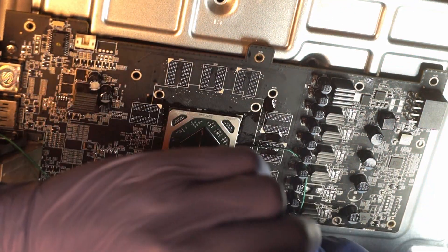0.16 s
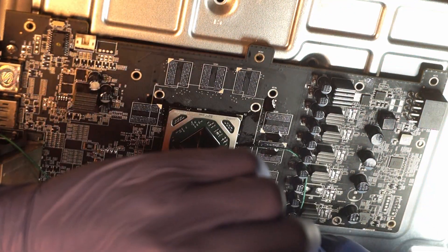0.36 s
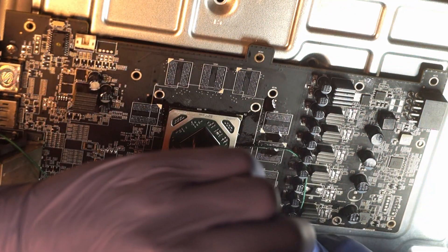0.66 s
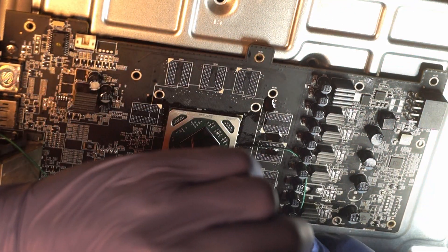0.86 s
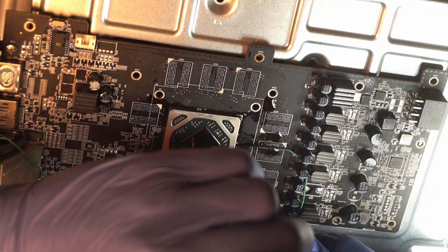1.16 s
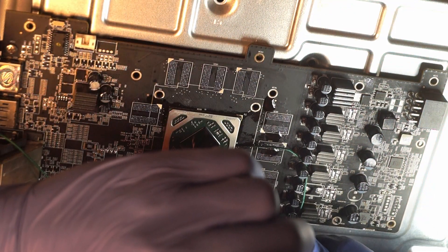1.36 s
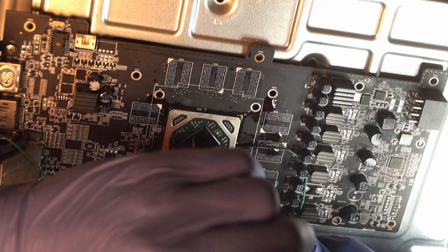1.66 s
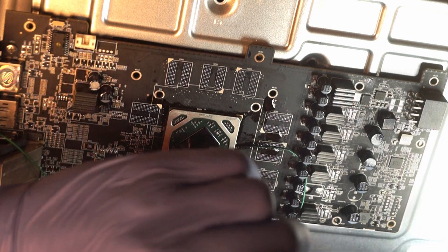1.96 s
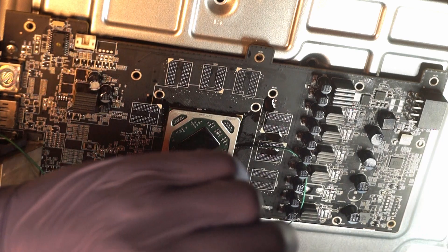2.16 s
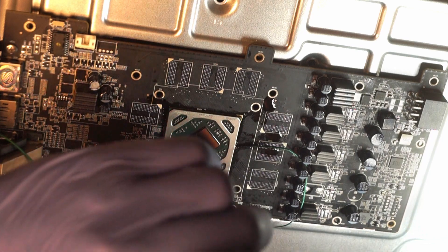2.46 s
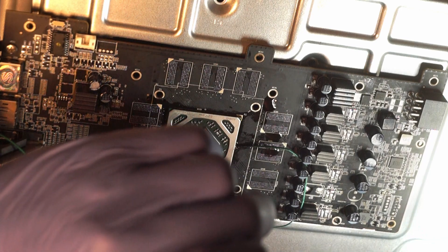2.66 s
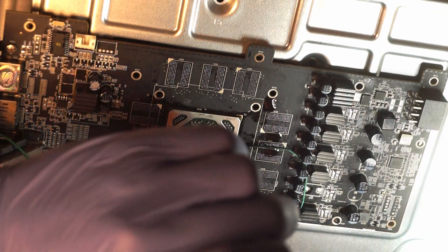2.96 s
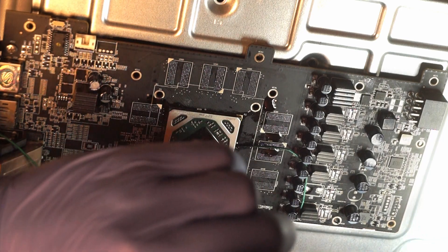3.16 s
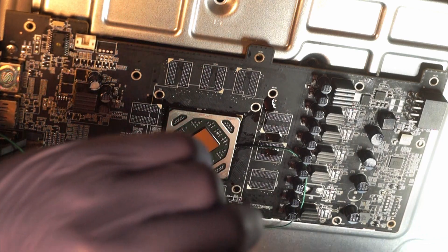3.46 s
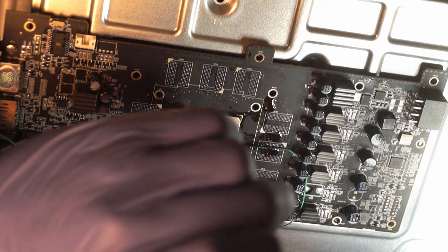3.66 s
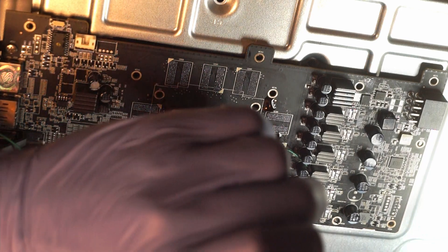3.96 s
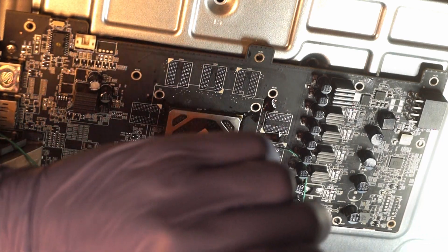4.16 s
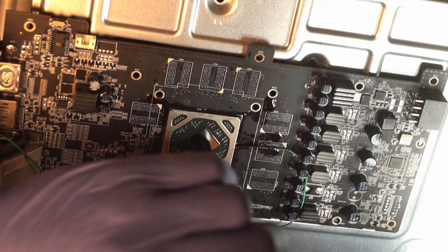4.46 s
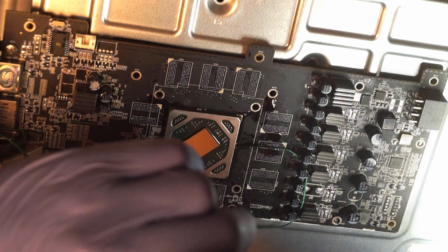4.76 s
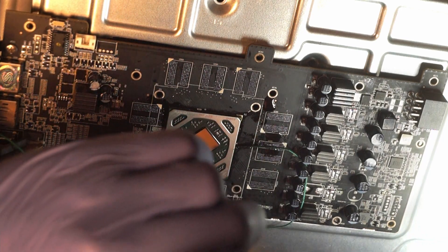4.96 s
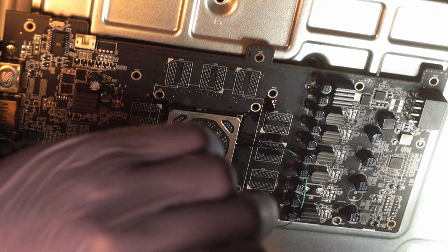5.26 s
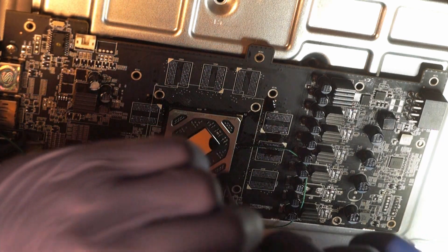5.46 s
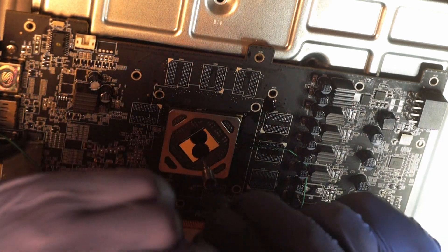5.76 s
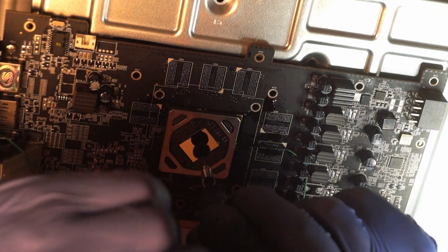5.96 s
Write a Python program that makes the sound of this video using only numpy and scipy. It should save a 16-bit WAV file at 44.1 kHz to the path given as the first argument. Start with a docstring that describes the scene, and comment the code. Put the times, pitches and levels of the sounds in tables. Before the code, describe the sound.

Close at a workbench in a small room, a hot air tool blows continuously: a breathy, fuzzy whistle inside a bright hiss, above a steady fan drone. Nearly halfway through comes a soft tap, then a sharp cluster of knocks with a short gritty slide. Afterwards the whistle dips and recovers as the hand turns the nozzle, fading again near the end while the hiss brightens.

```python
"""At a workbench, a hot air tool blows steadily over a circuit board. Its nozzle resonates in a fuzzy band near
3 kHz that fades as the hand turns it, while the jet's turbulent hiss brightens in swells. Something taps the
bench once, then knocks, rattles and slides on it: blows ring damped modes, friction makes gritty noise, and
the room answers with a decaying tail. A fan drones behind as shaped noise, with fuzzy tones and a wavering
blade tone."""
import sys
import numpy as np
from scipy import signal
from scipy.fft import rfft, irfft, next_fast_len
from scipy.io import wavfile
from scipy.ndimage import uniform_filter1d, map_coordinates

SR = 44100
rng = np.random.default_rng(int(sys.argv[2]) if len(sys.argv) > 2 else 0)


def decibels_to_gain(level_db):
    """Convert a level in decibels to a linear amplitude gain (20 dB per decade)."""
    exponent = np.asarray(level_db, float) / 20
    return 10 ** exponent


def wav_out(sig):
    """Save sig, one row per channel (or a flat mono array), as 16-bit PCM at SR to the path in sys.argv[1]."""
    wavfile.write(sys.argv[1], SR, np.round(np.clip(np.atleast_2d(sig).T, -1, 1) * 32767).astype(np.int16))


N = 269010  # length in samples


def unit(x):
    """Normalisation: scales x to an rms of 1."""
    return x / np.sqrt(np.mean(x ** 2) + 1e-20)


def along(points, hz):
    """Spectral interpolation: reads (Hz, value) points on a logarithmic frequency axis."""
    f, v = np.transpose(points)
    return np.interp(np.log(hz + 1), np.log(f + 1), v)


def swells(rows):
    """Superposition of bell-shaped swells (s, half length s, dB, ..): one curve for each dB column."""
    s, half, *columns = np.transpose(rows)
    bell = np.exp(-((np.arange(N)[:, None] / SR - s) / half) ** 2)
    return [bell @ column for column in columns]


def filtered(x, response):
    """Linear filtering: the spectrum of x is multiplied by a response of frequency."""
    m = next_fast_len(N + SR // 2)
    return irfft(rfft(x, m) * response(np.fft.rfftfreq(m, 1 / SR)), m)[..., :N]


def patched(x, depth_db, size, smear, twist=((1, 0),)):
    """Random modulation: a field smoothed over smear = (bins, frames) varies gain and left-right phase."""
    hz, _, z = signal.stft(x, SR, nperseg=size)
    field = uniform_filter1d(rng.standard_normal(z.shape), smear[0], 1)
    field = uniform_filter1d(field, smear[1], 2)
    # the two ears share most of the gain pattern, and turn in phase by opposite angles
    gain = decibels_to_gain(depth_db * unit(field + field[::-1] * 0.71))
    opposed = uniform_filter1d(field - field[::-1], 12, 1)
    phase = along(twist, hz)[:, None] * unit(opposed)
    return signal.istft(z * gain * np.exp(1j * phase), nperseg=size)[1][:, :N]


def rush(gain):
    """Partial coherence: stereo noise of rms 1, with the given gain over frequency."""
    # Each row: frequency in Hz, left-right correlation (no unit).
    alike = [(40, .3), (130, 0.83), (290, 1), (640, 0.81), (1400, 0.88), (3100, 0.77), (6800, 0.65),
             (15000, 0.26)]

    def turn(hz):
        return np.arccos(np.clip(along(alike, hz), -1, 1)) / 2

    def mid_side_gain(hz):
        return gain(hz) * [np.cos(turn(hz)), np.sin(turn(hz))]

    mid, side = filtered(rng.standard_normal((2, N)), mid_side_gain)
    return unit(np.array([mid + side, mid - side]))


def bands(modes):
    """Resonance: gain of side-by-side modes (Hz, width Hz, dB), each applied twice and summed in power."""
    return lambda hz: np.sqrt(sum(decibels_to_gain(2 * db) / (1 + (2 * (hz - c) / w) ** 2) ** 2 for c, w, db in modes))


def fuzzy(lines, width_hz, trim_db):
    """Narrow-band noise: a resonance on each line, at the lines' joint power shifted by trim_db."""
    total = np.sqrt(sum(decibels_to_gain(2 * db) for _, db in lines))
    return decibels_to_gain(trim_db) * total * rush(bands([(hz, width_hz, db) for hz, db in lines]))


def hot_air():
    """Flow noise: turbulence sings in the nozzle and hisses in the jet; turning shades song and body."""
    # Nozzle resonances. Each row: centre in Hz, width of one pass in Hz, relative level in dB.
    song_modes = [(2869, 52, -3.5), (3016, 63, 0.5), (3083, 74, -2), (3225, 124, 0), (3377, 21, -1),
                  (3320, 57, -15), (3334, 76, -16.5)]
    # Fuzzy tones of the heater tube. Each row: frequency in Hz, relative level in dB.
    pipe_lines = [(3629, -51), (3848, -54), (4000, -51), (4371, -55), (4421, -53), (4507, -55), (5324, -60)]
    # Spectrum of the jet's body. Each row: frequency in Hz, relative density in dB per Hz.
    jet_spectrum = [(1470, -46), (2500, -14.5), (2710, -15), (2920, -2), (3100, -13), (3510, -1.5),
                    (4650, -7), (5310, -5.5), (6580, -6.5), (8500, -16), (11000, -20), (18700, -120)]
    # Spectrum of the hiss. Each row: frequency in Hz, relative density in dB per Hz.
    hiss_spectrum = [(4400, -43), (7500, -2), (8600, -3.5), (9700, -1.5), (10800, -5), (11600, -7.5),
                     (13000, -8), (14300, -8.5), (15700, -8)]
    # Topmost hiss. Each row: centre in Hz, width of one pass in Hz, relative level in dB.
    sheen_modes = [(13400, 4300, 0)]
    # The hand turns the nozzle mouth away. Each row: time in seconds, shading of the song in dB.
    turning = [(0, 0), (1.6, 0.5), (2.1, 0.5), (2.8, -2), (3.15, -2), (3.45, -2.5), (3.6, -8), (3.9, -4.5),
               (4.2, -1.5), (4.5, 0), (4.8, -3), (4.9, -3.5), (5.3, -7), (5.62, -6), (5.75, -12), (6.1, -9)]
    # The jet swings nearer. Each row: centre in seconds, half length in seconds, swell of the hiss in dB,
    # swell of the topmost hiss in dB.
    swings = [(2.85, 0.39, -0.6, 8), (3.66, 0.14, 4.5, 6), (4.5, .12, 1.6, 1.5), (5.3, .3, 1.2, 7),
              (5.77, 0.16, 3.5, 3)]
    # base levels: nozzle facing, jet pointing past
    song_db, body_db, hiss_db, sheen_db = -32, -33, -41.5, -60
    body_follows = 0.22  # dB of jet body per dB of shading

    shade_db = np.interp(np.arange(N) / SR, *np.transpose(turning))
    hiss_swell_db, sheen_swell_db = swells(swings)
    voice = rush(bands(song_modes)) + fuzzy(pipe_lines, width_hz=21, trim_db=35.5)
    song = decibels_to_gain(song_db + shade_db) * voice
    body = decibels_to_gain(body_db + body_follows * shade_db) * rush(lambda hz: decibels_to_gain(along(jet_spectrum, hz)))
    hiss = decibels_to_gain(hiss_db + hiss_swell_db) * rush(lambda hz: decibels_to_gain(along(hiss_spectrum, hz)))
    hiss += decibels_to_gain(sheen_db + sheen_swell_db) * rush(bands(sheen_modes))
    # the moving hand reflects the treble: broad patches drift in and out
    return song + patched(body + hiss, depth_db=0.24, size=1024, smear=(10, 18))


def hand(x):
    """Reflection: the moving hand recolours the air sound."""
    # Colour of the reflection after the move. Each row: frequency in Hz, gain in dB.
    moved = [(1300, 0), (2050, -0.5), (2600, 0), (7000, 0), (8000, 1.5), (8800, -0.5), (9900, -0.5),
             (11000, -2), (11800, 2), (13300, -0.5)]
    # Narrow bands swell briefly, probably off the passing hand. Each row: centre in seconds,
    # half length in seconds, centre in Hz, peak gain in dB.
    glints = [(2.75, .3, 13400, 4), (3.0, .1, 15300, 5), (3.45, .08, 14300, 4), (3.68, .15, 12700, 1),
              (4.2, 0.064, 7800, 4), (5.0, .2, 11800, 2), (5.75, .12, 12600, 3), (5.8, .12, 9150, 5.5),
              (5.4, 0.42, 2030, 0.5)]
    move_s, move_rise_s = 2.35, 0.15  # the hand leaves its first rest
    glint_half_hz = 300

    hz, t, z = signal.stft(x, SR, nperseg=512)
    progress = (1 + np.tanh((t - move_s) / move_rise_s)) / 2
    db = np.outer(along(moved, hz), progress)
    for s, half, centre_hz, peak_db in glints:
        over_hz = np.exp(-((hz - centre_hz) / glint_half_hz) ** 2)
        over_time = np.exp(-((t - s) / half) ** 2)
        db = db + peak_db * np.outer(over_hz, over_time)
    return signal.istft(z * decibels_to_gain(db), nperseg=512)[1][:, :N]


def blow(push_hz):
    """Impact: a noisy crack and damped modes, excited most strongly near the push frequency; peak 1."""
    # Bench modes, before scatter. Each row: frequency in Hz, relative level in dB, 60 dB decay in seconds.
    modes = [(200, -9, 0.054), (366, -2.5, .04), (460, -4.5, 0.081), (570, 3, 0.028), (787, -1, 0.074),
             (1080, 5, 0.027), (1365, 7.5, 0.013), (1804, 7, 0.024), (2170, 2, 0.016), (2610, 6.5, 0.019),
             (3000, 8.5, 0.01), (3750, -4, 0.014), (4600, -6, 0.022), (6030, -2, 0.022)]
    t = np.arange(SR // 8) / SR
    ring = np.zeros(len(t))
    for hz, level, t60 in modes:
        mode_db = level + rng.normal(0, 3.3) - 2.5 * np.log2(hz / push_hz) ** 2
        mode_hz = hz * rng.normal(1, 0.022)
        ring += decibels_to_gain(mode_db - 60 * t / t60) * np.sin(2 * np.pi * mode_hz * t + rng.uniform(0, 2 * np.pi))
    octaves = signal.butter(2, [push_hz / 2, push_hz * 2], "band", fs=SR)
    crack = signal.lfilter(*octaves, rng.standard_normal(len(t))) * decibels_to_gain(11.0 - 60 * t / 0.016)
    x = (ring + crack) * (1 - np.exp(-t / 0.00014))  # soft onset
    return x / np.abs(x).max()


def knocks():
    """Superposition of impacts: a tap, then a cluster of knocks and rattles."""
    # Blows on the bench. Each row: start in seconds, peak level in dB before the low cut,
    # hardness as the centre of the push in Hz.
    blows = [(2.617, -19, 556), (2.620, -21, 1800), (2.625, -24, 500), (2.861, -8.5, 3450),
             (2.865, -7.5, 1800), (2.868, -11, 1800), (2.874, -14, 1110), (2.884, -14.5, 2000),
             (2.889, -11, 2500), (2.894, -13, 1500), (2.901, -18, 1200), (3.008, -19, 1700)]
    x = np.zeros(N + SR)
    for s, db, push_hz in blows:
        struck = decibels_to_gain(db) * blow(push_hz)
        x[round(s * SR):][:len(struck)] += struck
    return x[:N]


def slide():
    """Contact force as gain of the drag: it holds, swells with each shove and fades once lifted."""
    # The drag presses harder. Each row: centre in seconds, half length in seconds, swell in dB.
    shoves = [(2.945, .018, 3), (3.008, 0.016, 4)]
    start_s, lift_s, end_s = 2.872, 3.012, 3.07
    level_db, fade_db_per_s = -29.5, 252
    t = np.arange(N) / SR
    db = level_db + swells(shoves)[0] - fade_db_per_s * np.maximum(t - lift_s, 0)
    return decibels_to_gain(db) * (t > start_s) * (t < end_s)


def drag():
    """Friction: noise in random level steps of 60 samples, coloured and gated by the slide."""
    # Spectrum of the rubbing. Each row: frequency in Hz, relative density in dB per Hz.
    rub = [(35, -85), (60, -57), (202, 0.5), (237, -28), (360, -5.5), (495, -9), (768, -4), (865, -5),
           (3090, -9), (7000, -25), (9100, -39), (15400, -120)]
    steps_db = 3 * rng.uniform(-0.82, 1, N // 60 + 1).repeat(60)[:N]
    grit = rng.standard_normal(N) * decibels_to_gain(steps_db)
    return slide() * unit(filtered(grit, lambda hz: decibels_to_gain(along(rub, hz))))


def squeak():
    """Frictional tone: a thin sine under a bell-shaped envelope, in the drag."""
    # One row: centre in seconds, half length in seconds, frequency in Hz, peak level in dB.
    tone = (2.984, .022, 12700, -44)
    s, half, hz, db = tone
    t = np.arange(N) / SR - s
    return decibels_to_gain(db) * np.exp(-(t / half) ** 2) * np.sin(2 * np.pi * hz * t)


def bench():
    """High-pass filter: the small parts of the bench radiate little bass, which thins the knocks, drag and
    squeak."""
    low_cut = signal.butter(3, 300, "high", fs=SR, output="sos")
    return signal.sosfilt(low_cut, knocks() + drag() + squeak())


def room(x):
    """Reverberation: each frequency of the room's answer dies at its own speed."""
    # Each row: frequency in Hz, 60 dB decay time in seconds.
    decay = [(200, 0.13), (2000, 0.4), (10000, 0.13)]
    hz, t, z = signal.stft(rng.standard_normal((2, SR // 2)), SR, nperseg=256)
    tail = signal.istft(z * decibels_to_gain(-60 * t / along(decay, hz)[:, None]), SR, nperseg=256)[1]
    delayed = np.pad(x, (200, 0))[None]  # delay in samples
    return signal.fftconvolve(delayed, tail / np.linalg.norm(tail[0]), axes=1)[:, :N]


def fan():
    """Broadband and narrow-band flow noise: a steady drone with weak fuzzy tones."""
    # Drone of fan and blower. Each row: frequency in Hz, relative density in dB per Hz.
    drone_spectrum = [(24, -56), (112, -50), (150, -32), (198, -22), (235, -19), (262, -5.5), (389, -5),
                      (433, -7), (629, -15), (1030, -5.5), (1590, -7.5), (2000, -3), (2800, -3.5),
                      (3640, -16), (6160, -120)]
    # Fuzzy tones of the fan. Each row: frequency in Hz, relative level in dB.
    hum_lines = [(265, -59), (350, -55.5), (398, -52.5), (470, -57), (781, -59.5), (915, -53.5),
                 (1055, -53), (1518, -54.5), (1835, -52), (2051, -49.5), (2562, -51)]
    drone = decibels_to_gain(-36.5) * rush(lambda hz: decibels_to_gain(along(drone_spectrum, hz)))
    return drone + fuzzy(hum_lines, width_hz=14.8, trim_db=-2.0)


def blade_tone():
    """Blade passing: a thin line under slow random amplitude and phase modulation."""
    # One row: frequency in Hz, rms level in dB before the waver.
    blade = (210, -65)
    hz, db = blade
    t = np.arange(N) / SR
    # smooth curves through 8 random values per second
    values = rng.standard_normal((2, 60))
    waver = map_coordinates(values, [[[0] * N, [1] * N], [t * 8] * 2])
    return np.sqrt(2) * decibels_to_gain(db + 2.5 * waver[0]) * np.sin(2 * np.pi * hz * t + 0.4 * waver[1])


def standing_waves(x):
    """Interference: standing waves in the room comb the sound with a fine, slowly shifting ripple."""
    # Scatter of phase in each ear, opposite in sign. Each row: frequency in Hz, rms angle in radians.
    scatter = [(300, 0.059), (3000, 0.21), (8000, 0.65), (15000, 0.61)]
    return patched(x, depth_db=2.5, size=4096, smear=(2, 60), twist=scatter)


def scene():
    """Superposition: the steady air sound, the blade tone, and the bench with its reverberation."""
    air = standing_waves(hand(fan() + hot_air()))
    hits = bench()
    return air + blade_tone() + hits + decibels_to_gain(-5) * room(hits)


def low_pass(x):
    """Removes everything above the highest recorded frequency."""
    return signal.sosfilt(signal.butter(12, 17070, fs=SR, output="sos"), x)


def record(dry):
    """Transducer response: two microphones differ a little in colour and keep nothing above a band limit."""
    # Each row: frequency in Hz, left minus right level in dB.
    lean = [(60, 2), (180, -1.0), (550, -0.5), (1650, 0.0), (4970, 0.5), (15000, 0.5)]
    top_hz = 15740

    def colour(hz):
        return decibels_to_gain(along(lean, hz) / 2 * np.array([[1], [-1]])) * (hz < top_hz)

    return low_pass(filtered(dry, colour))


dry = scene()
out = record(dry)
wav_out(out)
```